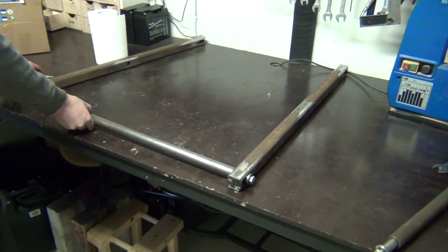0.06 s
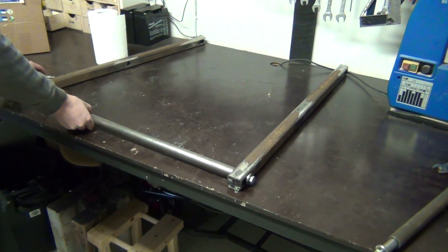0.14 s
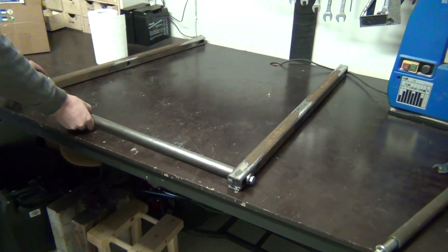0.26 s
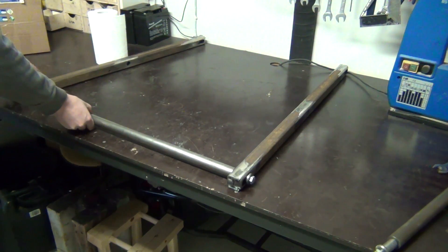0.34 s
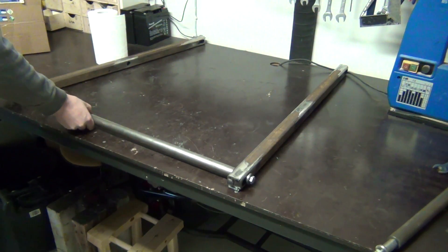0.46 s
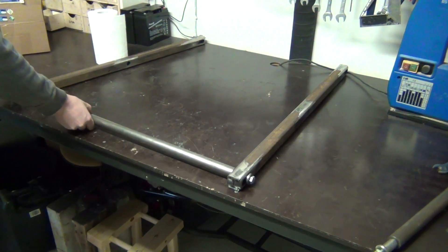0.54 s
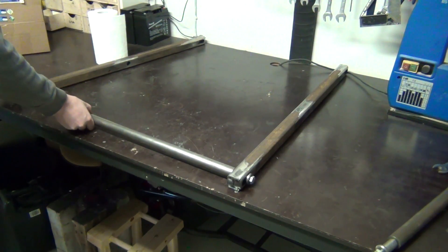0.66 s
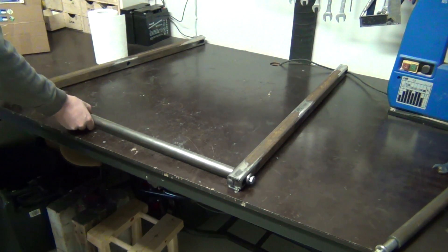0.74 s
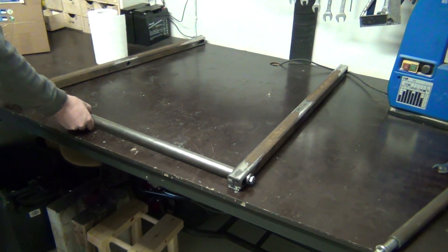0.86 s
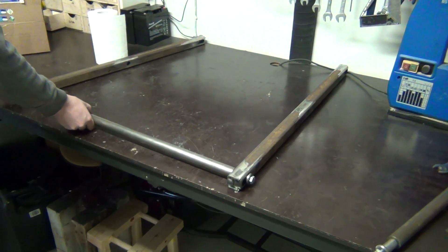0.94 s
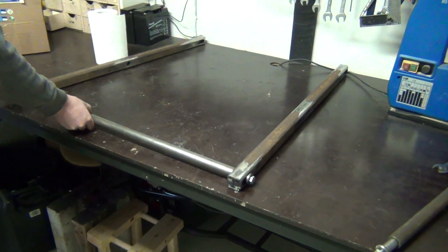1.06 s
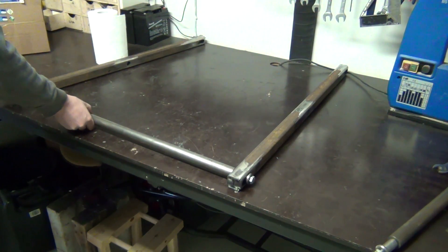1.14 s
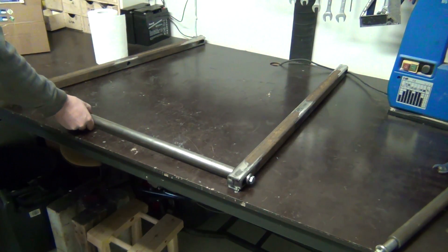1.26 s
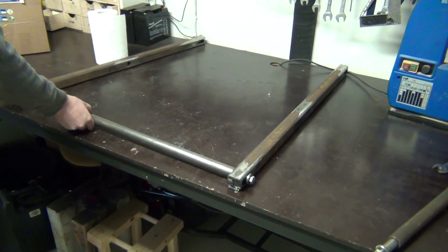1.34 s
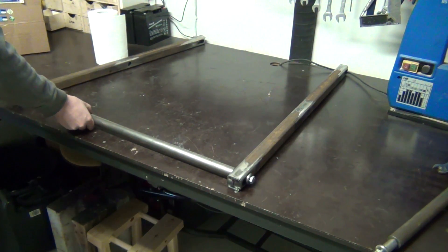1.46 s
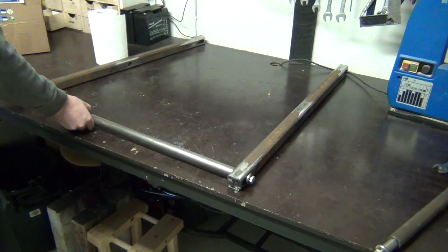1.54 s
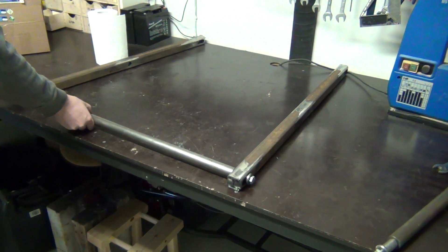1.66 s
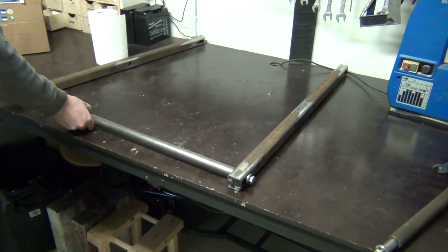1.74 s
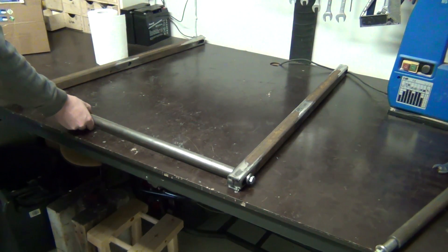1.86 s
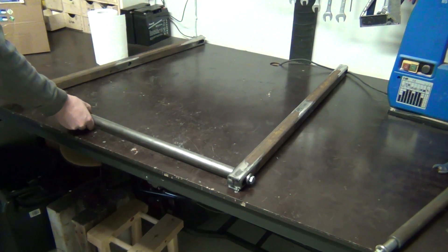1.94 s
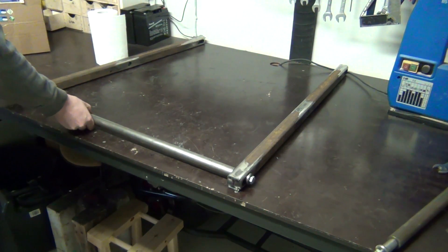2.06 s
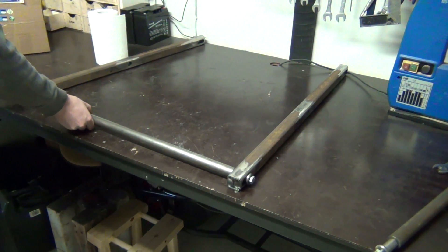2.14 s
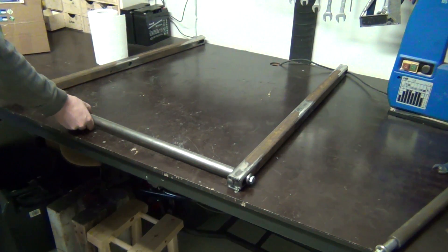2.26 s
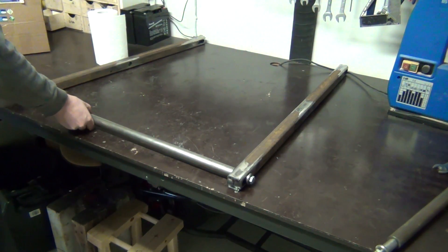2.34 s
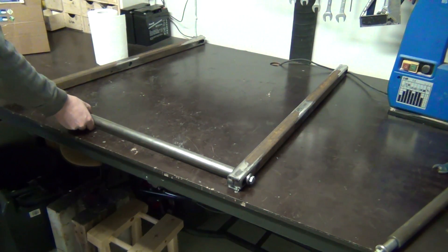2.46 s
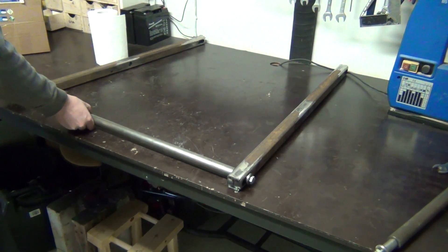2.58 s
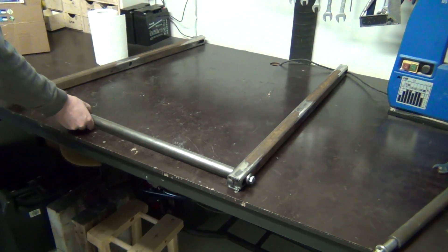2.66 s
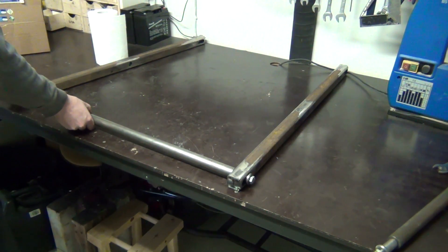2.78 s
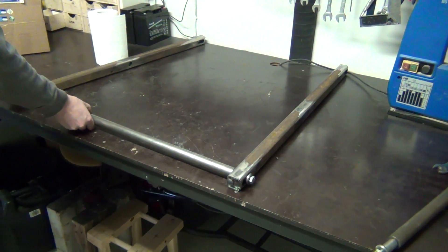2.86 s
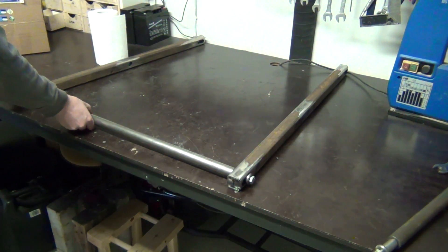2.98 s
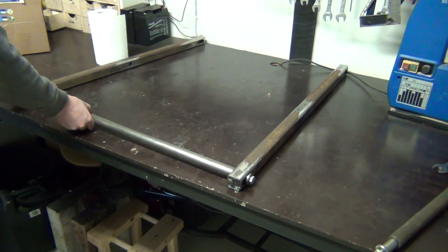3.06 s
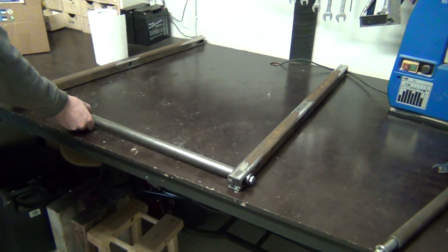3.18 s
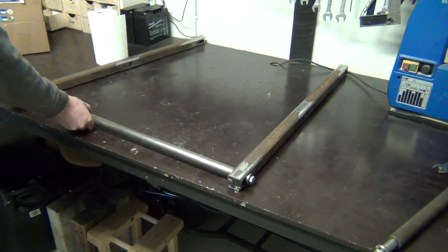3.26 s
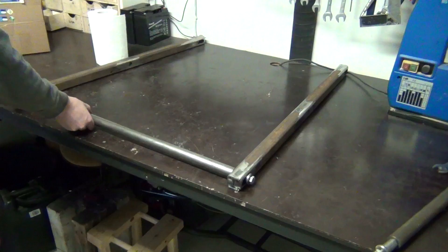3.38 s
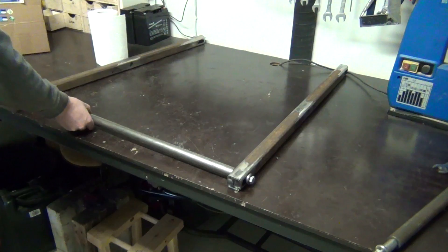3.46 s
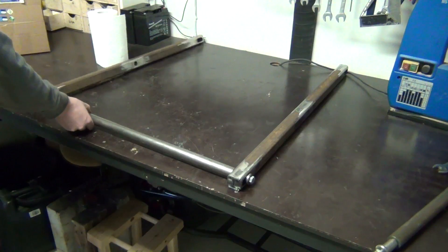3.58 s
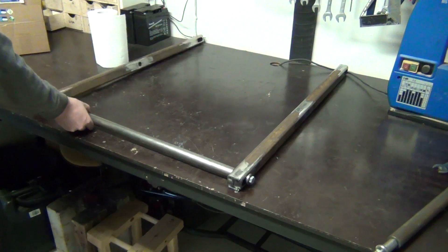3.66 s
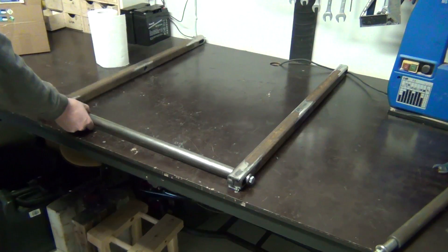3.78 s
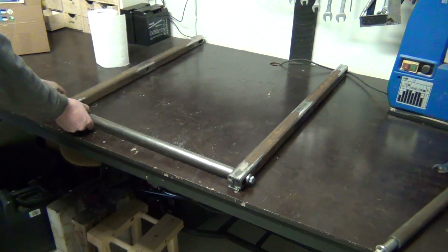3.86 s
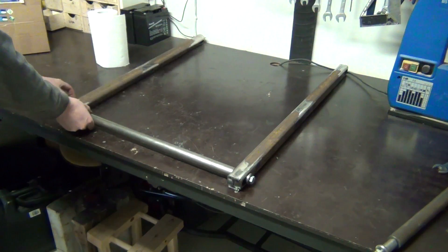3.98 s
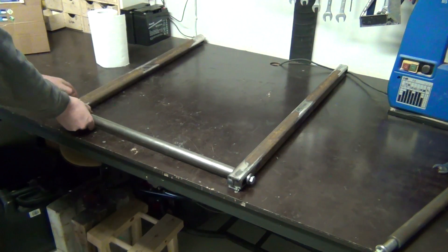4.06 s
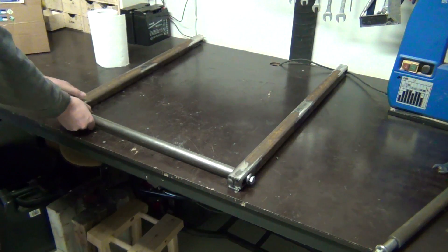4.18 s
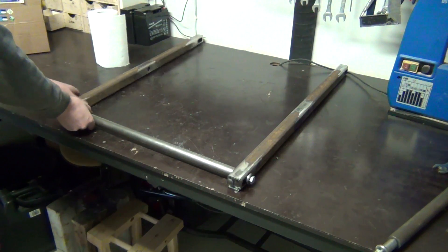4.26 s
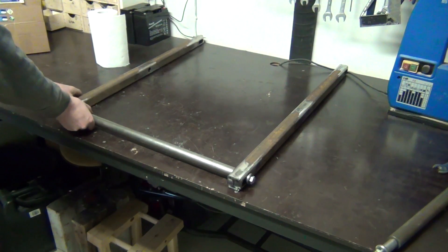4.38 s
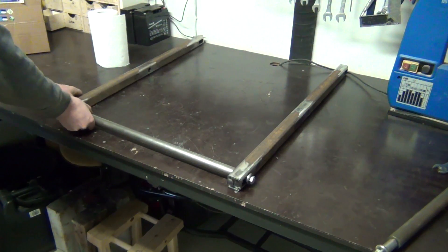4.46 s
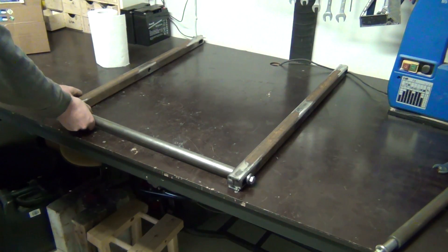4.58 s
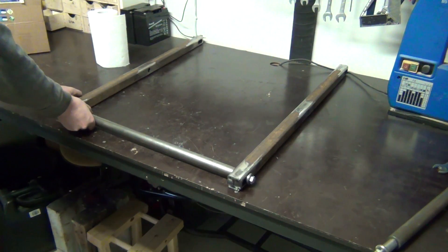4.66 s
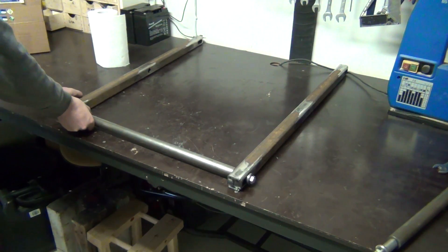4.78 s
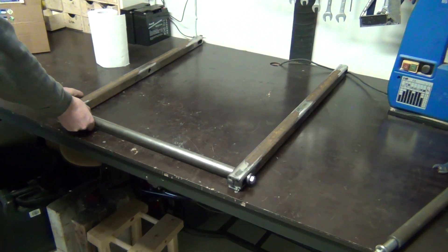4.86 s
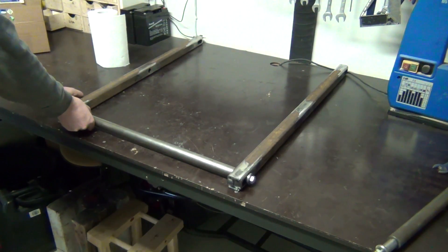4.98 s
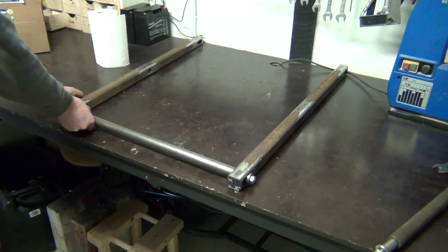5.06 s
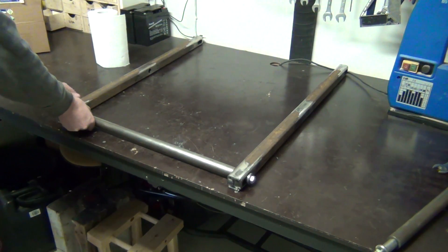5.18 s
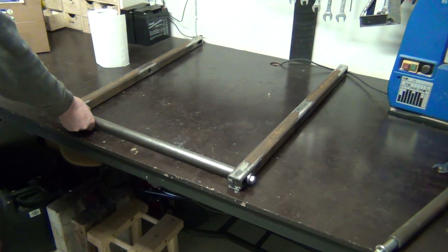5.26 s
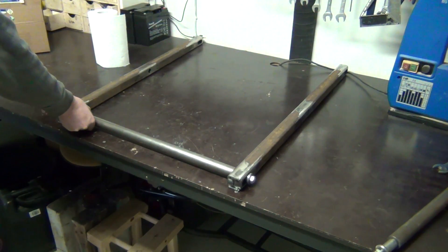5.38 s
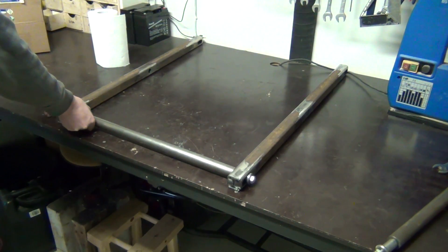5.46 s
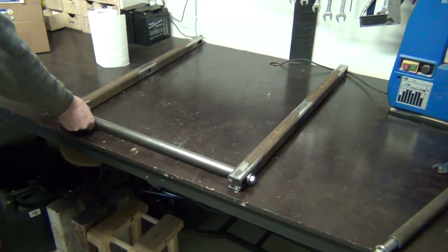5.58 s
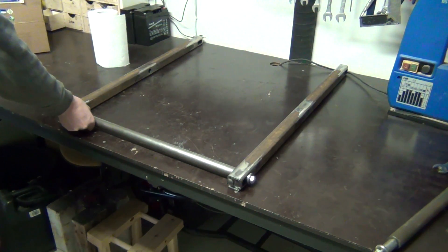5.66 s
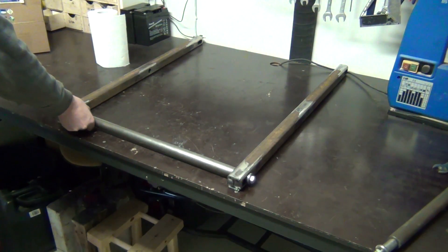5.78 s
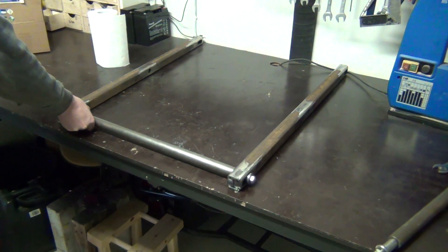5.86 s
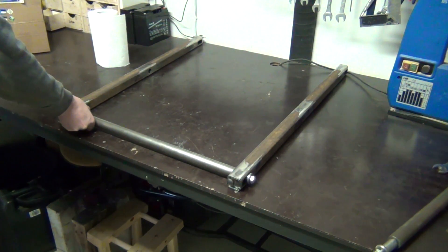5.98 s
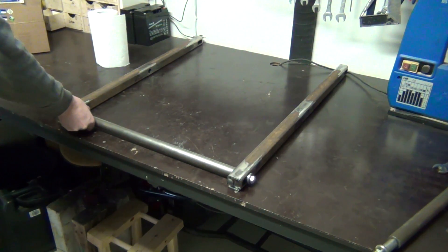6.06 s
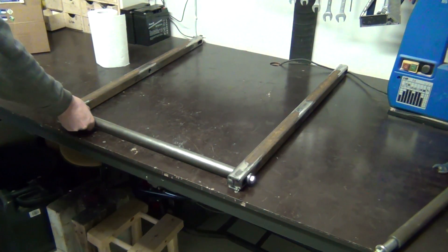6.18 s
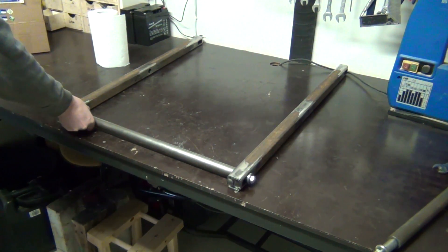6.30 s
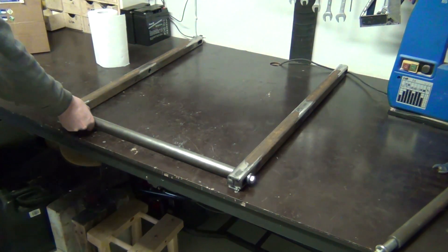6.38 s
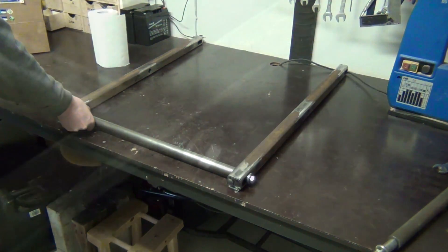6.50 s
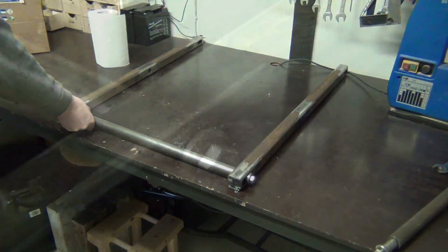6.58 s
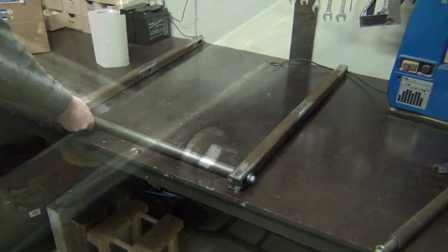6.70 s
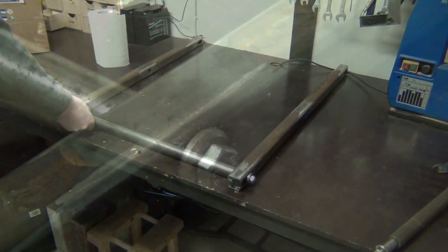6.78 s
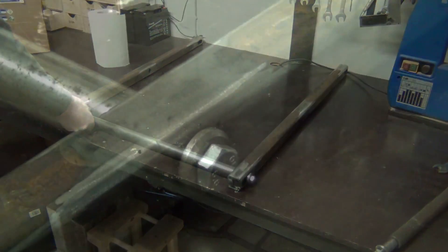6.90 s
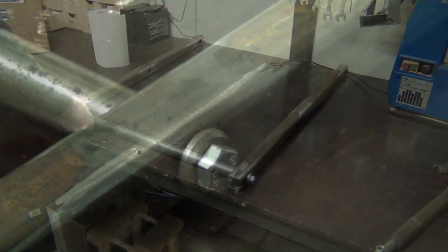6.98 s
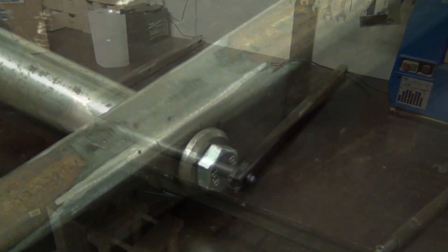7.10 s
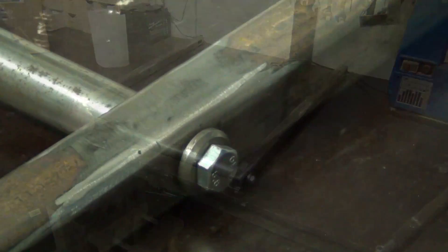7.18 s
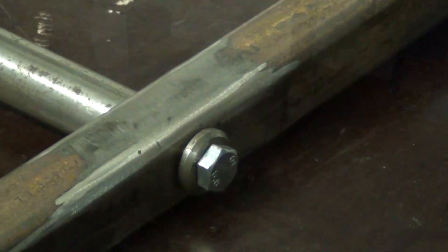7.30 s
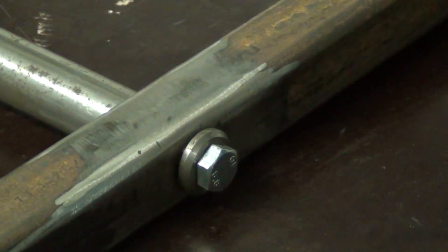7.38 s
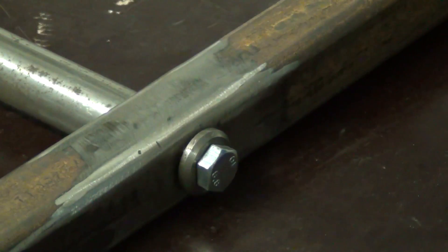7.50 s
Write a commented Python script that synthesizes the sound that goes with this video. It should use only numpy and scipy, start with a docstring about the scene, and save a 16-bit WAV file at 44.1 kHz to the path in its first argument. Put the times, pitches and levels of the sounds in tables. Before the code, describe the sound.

Quiet workshop air noise lies under everything, with a short room reverberation. At 0 s a drag over the wooden bench is already stopping. At 0.45 s a loose square steel tube is struck and sings clearly; from 0.57 to 1.0 s come clanks, a sharp dry tick, bolt clinks and bench thumps. From 1.2 to 1.8 s there are only small bumps and scuffs. Around 2.05 to 2.5 s steel taps, a gritty short push and thin squeaks. At 2.87 s a dull knock leads into bright, chattering frame clanks ringing until about 3.35 s. From 3.7 to 4.3 s the heaviest burst: deep bench thuds and rumbles, steel clanks and bolt clinks. Lighter clinks follow at 4.6 to 4.75 s. From 5 to 6.3 s faint taps, soft sliding and a tiny squeak. Then near quiet, a weak tick at 7.3 s and a soft scuffing hiss swelling at the end.

```python
"""In a small workshop, a steel frame is fitted together on a wooden workbench.
A square tube is knocked, dragged and pushed onto the end of a round bar: steel clanks and chatters,
a bolt clinks in its hole, and the bench top thuds and rumbles. Struck bodies are sums of decaying modes
with a diffuse wash; sliding, scuffs, ticks and knocks are shaped noise; squeaks are single decaying sines.
Quiet air noise lies under it all."""
import sys
import numpy as np
from scipy import signal
from scipy.fft import rfft, irfft, next_fast_len
from scipy.io import wavfile

SR = 44100
rng = np.random.default_rng(int(sys.argv[2]) if len(sys.argv) > 2 else 0)


def wrap_up_sound(samples):
    """Save the sound to the file named by the first command line argument, as 16-bit audio."""
    columns = np.atleast_2d(samples).T
    # keep every value between -1 and 1, then stretch to whole-number steps
    tamed = np.clip(columns, -1, 1)
    steps = np.round(tamed * 32767).astype(np.int16)
    wavfile.write(sys.argv[1], SR, steps)


N = 332514
RING_T = np.arange(int(0.7 * SR)) / SR  # time axis of one ring, in s

# Background air noise, spectral density: [f/Hz, level/dB]
AIR_COLOUR = [(15, -44), (25, -20.5), (194, -7.5), (342, -10), (392, -3), (425, -10.5), (856, -7.5),
              (1030, -11.5), (2800, -20.5), (3880, -20), (7020, -21.5), (10500, -22), (15800, -24)]
AIR_DB = -55

# Similarity of the two channels in diffuse noise: [f/Hz, correlation]
CHANNEL_CORRELATION = [(60, 1), (130, 1), (250, 1), (600, 0.88), (2000, 0.84), (4500, 0.73), (9000, 0.77),
                       (14000, 0.95)]
# Left channel relative to right: [f/Hz, level/dB]
LEFT_BALANCE = [(60, -4.4), (150, -2.5), (350, -.5), (2000, 0), (9000, .8)]
# Phase by which the left channel leads: [f/Hz, phase/rad]
LEFT_LEAD = [(40, -0.074), (260, -0.088), (2000, -0.15), (8000, 0.081)]
CUTOFF_HZ = 15850

# Dull, dead knocks of steel pressed into the wood: [t/s, level/dB]
KNOCKS = [(2.1, -36.5), (2.867, -23.5)]
# Spectral density of a knock: [f/Hz, level/dB]
KNOCK_COLOUR = [(60, -32), (150, -30), (290, -3), (480, -13.5), (900, -17), (3000, -29.5), (12000, -67)]
KNOCK_PEAK_S = 0.008

# Single modes of the steel set singing by rubbing: [t/s, f/Hz, level/dB, t60/s]
SQUEAKS = [(2.39, 8070, -41, 0.49), (2.5, 2580, -33, 0.25), (5.66, 4340, -52.5, 1.0)]
SQUEAK_ATTACK_S = 0.017

# Dry ticks of an edge catching: [t/s, level/dB, t60/s, tilt/(dB per octave)]
TICKS = [(.691, -15.5, 0.054, -4.5), (.755, -20.5, 0.059, -1), (1.369, -31.5, 0.16, -3.5),
         (2.486, -26.5, 0.051, -3), (3.514, -32.5, 0.15, -4), (3.688, -26, 0.09, -4.5),
         (4.159, -21, 0.16, -2.5), (5.08, -28.5, 0.15, -6.5), (7.34, -41, 0.031, 6)]
# Spectral density of a tick before its tilt: [f/Hz, level/dB]
TICK_COLOUR = [(200, -7), (1800, 6), (5000, -4), (11000, -3.5), (16000, -46)]
TICK_ATTACK_S = 0.00166

# Pushes of the frame along the bench: [t/s, length/s, rumble level/dB, scuff level/dB]
PUSHES = [(.19, 0.033, -55.5, -47), (1.202, 0.13, -44, -48.5), (1.352, 0.044, -40.5, -40),
          (1.44, .1, -44, -62), (1.694, 0.32, -50.5, -59), (2.339, 0.061, -31.5, -31.5),
          (2.923, 0.13, -41.5, -75), (3.352, 0.1, -50.5, -47.5), (3.527, 0.18, -45, -52.5),
          (3.76, 0.05, -15.5, -36), (4.214, 0.09, -12.5, -65), (4.455, 0.43, -46, -49.5),
          (5.059, 0.026, -40, -41.5), (5.3, 0.61, -49.5, -62), (6.011, 0.33, -44, -58)]
PUSH_ATTACK_S, RUMBLE_FALL_DB_PER_S, SCUFF_FALL_DB_PER_S = 0.035, 121, 141
# Spectral density of scuffing grit: [f/Hz, level/dB]
SCUFF_COLOUR = [(60, -29.5), (250, 3), (900, 3.5), (1400, 3.5), (1900, 1.5), (2400, 0.5), (3000, -5),
                (5000, -8), (9000, -14.5), (13000, -19), (16000, -31.5)]
# Soft scuffing hiss, strongest at the end: [t/s, level/dB]
LATE_HISS = [(6.6, -73.5), (6.91, -58.5), (7.034, -63.5), (7.54, -47)]

# The tube is dragged lengthwise over the bench and slows; the level holds until DRAG_S, then falls.
DRAG_S, DRAG_DB, DRAG_SCUFF_DB, DRAG_FALL_DB_PER_S = 0.035, -11.5, -35.5, 119.5
# Spectral density of the drag: [f/Hz, level/dB]
DRAG_COLOUR = [(30, -33), (70, -25), (125, -17.5), (200, -16), (260, -11.5), (470, 3), (580, 1.5),
               (730, -7.5), (980, -2.5), (1250, -11), (2200, -18), (4400, -36), (9500, -52.5), (16000, -65)]

# Blows on each body: [t/s, level/dB, brightness/dB, chatter time constant/s]
BENCH_HITS = [(.46, -40, 4.5, .058), (.575, -40, 9, 0.099), (.691, -30.5, 4.5, .011),
              (.76, -32.5, 2, 0.056), (.927, -33.5, 4, .04), (.985, -38.5, 0.5, .03),
              (1.378, -39, -1.5, .03), (1.786, -55.5, -29, .03), (2.075, -30.5, -5, 0.012),
              (2.234, -34.5, -0.5, 0.027), (2.385, -41, -4, 0.058), (3.524, -30, -9.5, 0.012),
              (3.69, -22, -3.5, 0.00992), (3.743, -16, 0.5, 0.017), (3.775, -23, 3, 0.013),
              (3.947, -25, 9, .03), (4.165, -24, 5.5, .03), (4.195, -28, -14.5, 0.037),
              (4.246, -19.5, 4.5, 0.025), (4.335, -20.5, 6, 0.018), (4.635, -32.5, -1, 0.086),
              (4.75, -33, -5, 0.028), (5.085, -46, 9.5, 0.017), (5.48, -45.5, -9.5, 0.036),
              (5.69, -42.5, -4.5, .04), (6.156, -41, -4, 0.018), (6.2, -46, -14, .03),
              (7.328, -54, -6, .012)]
BOLT_HITS = [(.691, -37.5, -8.5, 0.0068), (.808, -50, 23, .005), (.988, -46.5, -11, .011),
             (3.908, -24, -1.5, 0.0022), (3.975, -36.5, -13.5, 0.00085), (4.615, -40, 1, .007),
             (4.701, -29, 10, 0.0099), (6.039, -50.5, 8, 0.0059)]
FRAME_HITS = [(.572, -27.5, -37, 0.005), (.691, -18.5, -16.5, .003), (.757, -23, -16, .019),
              (.808, -30, -4.5, .006), (.982, -30.5, -13, 0.0072), (1.222, -42.5, -13, 0.02),
              (1.955, -59.5, 2, 0.084), (2.058, -31, 8.5, 0.023), (2.232, -40, -41, 0.0077),
              (2.322, -38, -7, 0.015), (2.486, -38.5, -6.5, 0.0089), (2.879, -23.5, -1, 0.013),
              (2.897, -28, 6.5, 0.033), (2.96, -22.5, -0.5, 0.054), (3.025, -26, -6, 0.015),
              (3.752, -36.5, -14, 0.24), (3.902, -24.5, -3.5, 0.011), (3.946, -17, -16, 0.012),
              (3.975, -22, -9, 0.0013), (4.246, -29.5, -8.5, 0.079), (4.628, -40, -11, 0.029),
              (4.735, -35.5, -13, 0.022), (5.02, -46.5, -12, .014), (5.466, -49.5, -13, 0.0051),
              (5.67, -44.5, -14, 0.15), (6.04, -48, -19, 0.012), (6.149, -39.5, -16, 0.018),
              (6.29, -48, -11.5, 0.04)]  # the joined frame
TUBE_HITS = [(.443, -17.5, 0, 0.0058)]  # the loose square tube

# Vibration modes of each body: [f/Hz, level/dB, t60/s]
BENCH_MODES = [(61, 0, 1), (120.2, 5.5, 0.35), (186.4, 1, 0.75), (239, -0.5, 0.95), (282.6, 5.5, 0.47),
               (309.2, 2.5, 0.38), (349, -1, 0.79), (397, 0, 0.78), (470.4, -2, 0.66), (533, -3.5, 0.95),
               (584.8, -7, 0.38), (696, -15.5, 0.253), (765.6, 4, 0.14), (956, -5.5, 0.072),
               (1037, -10.5, 0.31), (1444, 0, 0.11)]
BOLT_MODES = [(2012, -2, .2), (3040, -4, 1.3), (3155, -4, .9), (3250, 2, .15), (4730, -2, .22),
              (4820, -1, .24), (6480, -3, .09), (10300, -20, .15)]
FRAME_MODES = [(745, -1, .5), (785, -4, .55), (1365, 1, .38), (1402, -2, .5), (1565, -5, .4),
               (1610, -8, .5), (2243, -3, .4), (2314, -2, .42), (2595, -9, .5), (3050, -8, .7),
               (3148, -5, .6), (3985, -6, .5), (4542, -11, .5), (4810, -2, .4), (4837, -4, .45),
               (5225, -9, .45), (5421, -12, .8), (5723, -3, .38), (5828, -7, .6), (6675, 0, .42),
               (6742, -6, .45), (7820, -6, .55), (8407, -7, .35), (8641, -7, .35), (8950, -6, .55),
               (9420, -6, .5), (9500, -6, .45), (9635, -3, .45), (10742, -3, .35), (11258, -7, .45)]
TUBE_MODES = [(787, -12, .7), (834, -13, .5), (1403, -8, .7), (1623, -12, .7), (2339, 0, .28),
              (3073, -16, .5), (3120, -15, .4), (3173, -9, .5), (4355, -4, 1.5), (5239, 3, .34),
              (5730, -21, .7), (6516, -2, .9), (7368, -6, .5), (7540, -9, .4), (7712, -1, .43),
              (7999, -16, 1.1), (8415, -20, .5), (8642, -6, .46), (8952, -13, .6), (9415, -16, .35),
              (9653, -21, .6), (10431, -18, .4), (11250, -28, .7), (12400, -27, .6), (12800, -27, .3),
              (13530, -20, .45)]

# Spectral density of the weaker modes between the main ones: [f/Hz, level/dB]
WOOD_WASH = [(25, -19), (42, -13.5), (60, 0.5), (95, -0.5), (130, 0), (300, 1), (700, -0.5), (1300, -5),
             (2000, -13.5), (3000, -27), (6000, -35), (12000, -59), (16000, -76)]
STEEL_WASH = [(100, -19.5), (500, -10), (900, -3), (1700, -2), (3500, 2), (6000, -3), (10500, -3.5),
              (12500, -8), (14000, -13.5), (16000, -43.5)]

# Effect of brightness; rows are the low, middle and high register:
# [level at zero brightness/dB, level change per dB of brightness/dB]
BENCH_VOICE = [(-7, -0.94), (0.5, 0.14), (-4.5, 0.85)]
BOLT_VOICE = [(-17, 0.94), (-1, -0.59), (-15, 1)]
FRAME_VOICE = [(0.18, 0.02), (-0.54, 0.91), (0.38, 1.46)]
TUBE_VOICE = [(-8, 5.5), (-3, 0), (-6.5, 9)]

# Steel lifted clear of the wood, then set down, which chokes its ring: [start t/s, end t/s]
LIFTS = [(.44, .69), (2.89, 3.35), (3.9, 4.165)]
BENCH_CHOKE_S = 6.4  # bench rings begun well before this are choked from here
REBOUND_CONTACT_S = 0.00023


def from_db(db):
    """Level definition: amplitude ratio from decibels."""
    return 10 ** (np.asarray(db) / 20)


def rms_one(x):
    """Normalisation to unit root-mean-square amplitude."""
    return x / np.sqrt(np.mean(x ** 2) + 1e-20)


def opening_rms(x):
    """Root-mean-square amplitude over the first 50 ms."""
    return np.sqrt(np.mean(x[..., :SR // 20] ** 2) + 1e-20)


def fade(t60):
    """Exponential decay: 60 dB in t60 seconds."""
    return np.exp(-np.log(1000) * RING_T / t60)


def onset(attack_s):
    """Exponential approach to full amplitude."""
    return 1 - np.exp(-RING_T / attack_s)


def in_time(rows):
    """Linear interpolation of a level over the whole scene."""
    return np.interp(np.arange(N) / SR, *np.transpose(rows))


def at_hz(points, hz):
    """Interpolation of a spectral curve along logarithmic frequency."""
    f, value = np.transpose(points)
    return np.interp(np.log(hz + 1), np.log(f), value)


def add(out, s, sound):
    """Superposition: a sound is added from time s on."""
    at = max(int(s * SR), 0)
    out[:, at:at + sound.shape[-1]] += sound[:, :N - at]


def noise(colour, size, modes=(), width_hz=60, skirt_db=0, modes_per_hz=np.inf):
    """Filtered random spectrum: partly correlated stereo noise, raised around each mode; rms 1."""
    length = next_fast_len(size)
    hz = np.arange(length // 2 + 1) * SR / length
    clusters = sum(from_db(db + skirt_db) ** 2 / (1 + ((hz - f) / width_hz) ** 2) ** 2 for f, db, _ in modes)
    white = rfft(rng.standard_normal((2, length)))
    mid, side = white * from_db(at_hz(colour, hz)) * np.sqrt(1 + clusters)
    alike = np.clip(at_hz(CHANNEL_CORRELATION, hz), 0, 0.99)
    pair = np.sqrt(1 + alike) * mid + np.sqrt(1 - alike) * side * [[1], [-1]]
    # few modes per Hz leave separate spectral lines
    present = rng.random(len(hz)) < modes_per_hz * SR / length
    return rms_one(irfft(pair * present, length)[:, :size])


def air():
    """Stationary random noise: the quiet background of the workshop."""
    return from_db(AIR_DB) * noise(AIR_COLOUR, N)


def workshop(x, t60=0.54, wet_db=-13, delay_s=0.02):
    """Reverberation by convolution: a short, delayed diffuse tail from the walls."""
    colour = [(50, 3.5), (500, -4), (4000, 1.0), (15000, -6.5)]  # f/Hz, level/dB
    tail = noise(colour, len(RING_T)) * fade(t60) * (RING_T > delay_s)
    tail = tail / np.sqrt(np.sum(tail ** 2) / 2)
    return x + from_db(wet_db) * signal.fftconvolve(x, tail, axes=1)[:, :N]


def knocks():
    """Heavily damped contact: noise swells and dies within a few hundredths of a second."""
    out = np.zeros((2, N))
    pulse = RING_T / KNOCK_PEAK_S * np.exp(1 - RING_T / KNOCK_PEAK_S)
    for s, db in KNOCKS:
        add(out, s, from_db(db) * pulse * noise(KNOCK_COLOUR, len(RING_T)))
    return out


def squeaks():
    """Friction excitation of one mode: a sine builds up, then rings out."""
    out = np.zeros((2, N))
    for s, hz, db, t60 in SQUEAKS:
        tone = np.sin(2 * np.pi * hz * RING_T[None])
        add(out, s, from_db(db) * onset(SQUEAK_ATTACK_S) * fade(t60) * tone)
    return out


def ticks():
    """Broadband transient: tilted noise with a fast onset and decay, without modes."""
    out = np.zeros((2, N))
    for s, db, t60, tilt in TICKS:
        colour = [(hz, level + tilt * np.log2(hz)) for hz, level in TICK_COLOUR]
        colour = [(50, colour[0][1] - 25)] + colour  # little energy in the bass
        add(out, s, from_db(db) * onset(TICK_ATTACK_S) * fade(t60) * noise(colour, len(RING_T)))
    return out


def dragging(db, fall_db_per_s):
    """Gain of decelerating friction: the drag is already under way and soon slows."""
    return from_db(db - fall_db_per_s * np.maximum(np.arange(N) / SR - DRAG_S, 0))


def strokes(rows, fall_db_per_s):
    """Gain of transient sliding: each stroke gathers speed, holds, then dies away."""
    gain, t = np.zeros((1, N)), np.arange(SR) / SR
    for s, length_s, db in rows:
        fall_db = fall_db_per_s * np.maximum(t[None] - length_s, 0)
        add(gain, s, np.minimum(t / PUSH_ATTACK_S, 1) * from_db(db - fall_db))
    return gain


def scuffs(per_s=1500, size_db=4, grain_db=-3):
    """Stick-slip friction of grit under the steel: random tiny slips over a diffuse hiss."""
    size = from_db(size_db * np.minimum(rng.exponential(1, N), 4))
    slips = (rng.random(N) < per_s / SR) * rng.choice([-1, 1], N) * size
    hz = np.arange(N // 2 + 1) * SR / N
    grains = rms_one(irfft(rfft(slips) * from_db(at_hz(SCUFF_COLOUR, hz)), N))
    sliding = strokes([(s, length_s, db) for s, length_s, _, db in PUSHES], SCUFF_FALL_DB_PER_S)
    gain = sliding + dragging(DRAG_SCUFF_DB, SCUFF_FALL_DB_PER_S) + from_db(in_time(LATE_HISS))
    return gain * rms_one(noise(SCUFF_COLOUR, N) + from_db(grain_db) * grains)


def chatter(length_s, per_s=900, rebound_db=-4):
    """Repeated impact: a first contact, then irregular rebounds that die away."""
    t = RING_T[:SR // 4]
    rebounds = (rng.random(len(t)) < per_s / SR) * rng.standard_normal(len(t))
    force = rebounds * from_db(rebound_db) * np.exp(-t / length_s)
    force[0] = 1
    return force


def registers(x, low_hz, high_hz):
    """Band splitting: the low, middle and high part of a sound."""
    edges = ((low_hz, "low"), ([low_hz, high_hz], "band"), (high_hz, "high"))
    return [signal.sosfilt(signal.butter(4, hz, kind, fs=SR, output="sos"), x) for hz, kind in edges]


def choked(s, chokes, t60=0.31):
    """Contact damping: a ring begun at s decays faster from the next choke over 50 ms later."""
    contact = min([c for c in chokes if c > s + RING_T[SR // 20]], default=np.inf)
    return np.exp(-np.log(1000) * np.maximum(s + RING_T - contact, 0) / t60)


def blows(hits, voice, resting_db_per_s, lifted_db_per_s):
    """Excitation and damping: brightness weights the registers, and lifting alters the extra decay."""
    out = []
    for s, db, bright, length_s in hits:
        levels_db = [db + base + slope * bright for base, slope in voice]
        lifted = any(up <= s < down for up, down in LIFTS)
        out.append((s, *levels_db, length_s, lifted_db_per_s if lifted else resting_db_per_s))
    return out


def struck(hits, modes, wash, low_hz, high_hz, wash_db, wash_t60, width_hz, skirt_db,
           modes_per_hz, vary_db, spread, swell, attack_s, chokes=()):
    """Modal superposition: each blow rings a body's damped modes and a wash of weaker ones."""
    out = np.zeros((2, N))
    count, size = len(modes), len(RING_T)
    rings = np.array([from_db(db) * fade(t60) * np.exp(2j * np.pi * hz * RING_T)
                      for hz, db, t60 in modes], np.complex64)
    for s, *levels_db, length_s, damping_db_per_s in hits:
        # every mode reaches the two channels with its own strength and phase
        strength = from_db(vary_db * rng.standard_normal(count)) * np.exp(2j * np.pi * rng.random(count))
        apart = spread * (rng.standard_normal(count) + 1j * rng.standard_normal(count))
        weights = strength * (1 + apart * [[1], [-1]])
        lines = (weights.astype(np.complex64) @ rings).real
        lines = lines * (1 - swell * np.exp(-RING_T / length_s))  # rebounds keep feeding the modes

        dense = noise(wash, size, modes, width_hz, skirt_db, modes_per_hz) * fade(wash_t60)
        dense = dense * onset(REBOUND_CONTACT_S)  # every contact is cushioned a little
        dense = signal.fftconvolve(dense, chatter(length_s)[None], axes=1)[:, :size]
        # a short blow rings clean, a long chatter fills the gaps between the modes
        rattle = from_db(wash_db) * np.sqrt(length_s / RING_T[SR // 50])

        blow = lines / opening_rms(lines) + rattle * dense / opening_rms(dense)
        blow = blow * onset(attack_s) * from_db(-damping_db_per_s * RING_T) * choked(s, chokes)
        parts = registers(blow, low_hz, high_hz)
        add(out, s, sum(from_db(db) * part / opening_rms(part) for db, part in zip(levels_db, parts)))
    return out


def bench():
    """Forced vibration of a wooden plate: it thuds under bumps and rumbles while steel slides on it."""
    bumps = blows(BENCH_HITS, BENCH_VOICE, resting_db_per_s=28, lifted_db_per_s=21)
    thuds = struck(bumps, BENCH_MODES, WOOD_WASH, 202.6, 786, wash_db=6, wash_t60=0.46, width_hz=69,
                   skirt_db=3.5, modes_per_hz=0.3, vary_db=2.0, spread=0.27, swell=0.7,
                   attack_s=0.002, chokes=[BENCH_CHOKE_S])
    sliding = strokes([(s, length_s, db) for s, length_s, db, _ in PUSHES], RUMBLE_FALL_DB_PER_S)
    rumble = sliding * noise(WOOD_WASH, N, BENCH_MODES, width_hz=7.3, skirt_db=11)
    drag_noise = noise(DRAG_COLOUR, N, BENCH_MODES, width_hz=11, skirt_db=3.5)
    drag = dragging(DRAG_DB, DRAG_FALL_DB_PER_S) * drag_noise
    return thuds + rumble + drag


def bolt(landings):
    """Strongly damped resonance: the bolt clinks briefly in its hole."""
    clinks = blows(BOLT_HITS, BOLT_VOICE, resting_db_per_s=97, lifted_db_per_s=31)
    return struck(clinks, BOLT_MODES, STEEL_WASH, 1800, 4090, wash_db=6.5, wash_t60=0.13, width_hz=95,
                  skirt_db=37, modes_per_hz=0.25, vary_db=1.4, spread=0.3, swell=0.25,
                  attack_s=0.0008, chokes=landings)


def frame(landings):
    """Coupled resonance with repeated impact: the joined frame clanks and rattles in modal clusters."""
    clanks = blows(FRAME_HITS, FRAME_VOICE, resting_db_per_s=36.5, lifted_db_per_s=0)
    return struck(clanks, FRAME_MODES, STEEL_WASH, 1480, 5470, wash_db=8.5, wash_t60=0.37, width_hz=34,
                  skirt_db=21, modes_per_hz=0.12, vary_db=1.8, spread=0.3, swell=0.45,
                  attack_s=0.002, chokes=landings)


def tube(landings):
    """Modal resonance of a loose body: the square tube sings in clear spectral lines."""
    knocked = blows(TUBE_HITS, TUBE_VOICE, resting_db_per_s=0, lifted_db_per_s=17)
    return struck(knocked, TUBE_MODES, STEEL_WASH, 2000, 7000, wash_db=-2, wash_t60=0.35, width_hz=45,
                  skirt_db=17, modes_per_hz=0.12, vary_db=5.0, spread=0.38, swell=0.9,
                  attack_s=0.0024, chokes=landings)


def steel():
    """Superposition of the steel bodies, all choked when the steel comes down on the wood."""
    landings = [down for _, down in LIFTS]
    return bolt(landings) + frame(landings) + tube(landings)


def scene():
    """Superposition: all contact sounds reverberate in the workshop, over the air noise."""
    contacts = knocks() + squeaks() + ticks() + scuffs() + bench() + steel()
    return air() + workshop(contacts)


def record(dry, top=1.1):
    """Stereo transduction: the right channel takes more bass; peaks are rounded, the top is cut."""
    hz = np.arange(N // 2 + 1) * SR / N
    halves = np.array([[0.5], [-0.5]])  # each difference is shared between left and right
    balance = from_db(at_hz(LEFT_BALANCE, hz) * halves)
    phase = np.exp(1j * at_hz(LEFT_LEAD, hz) * halves)
    heard = irfft(rfft(dry) * balance, N)
    heard = irfft(rfft(heard) * phase, N)
    rounded = top * np.tanh(heard / top)
    return signal.sosfilt(signal.ellip(12, 0.1, 80, CUTOFF_HZ, fs=SR, output="sos"), rounded)


dry = scene()
out = record(dry)
wrap_up_sound(out)
```